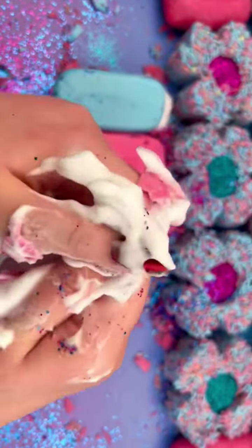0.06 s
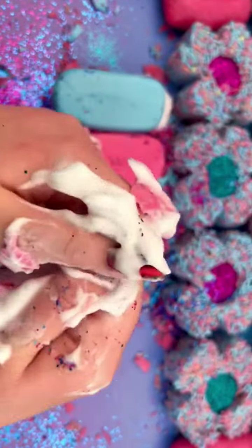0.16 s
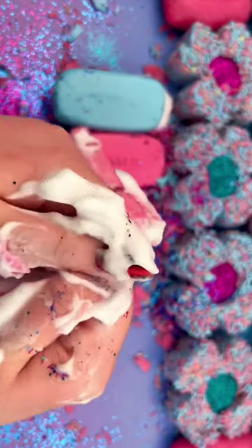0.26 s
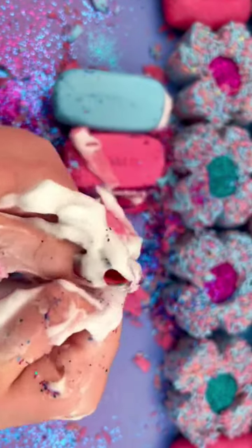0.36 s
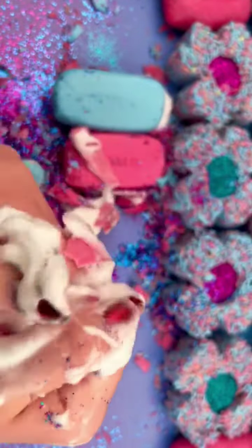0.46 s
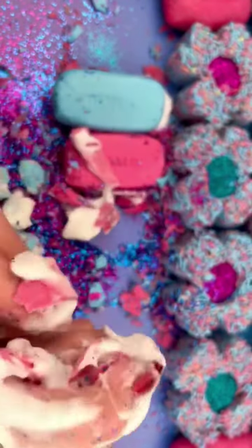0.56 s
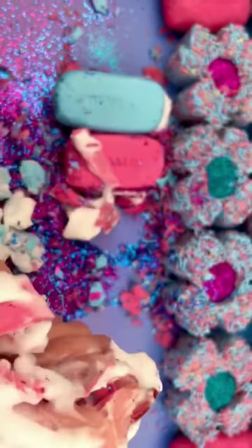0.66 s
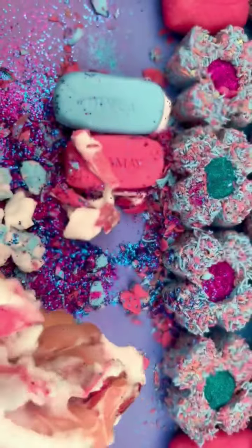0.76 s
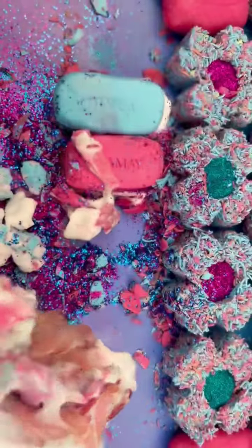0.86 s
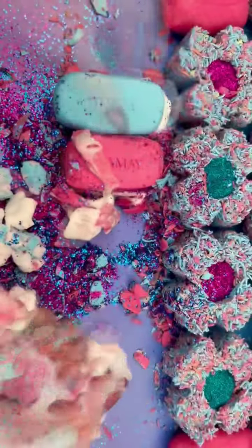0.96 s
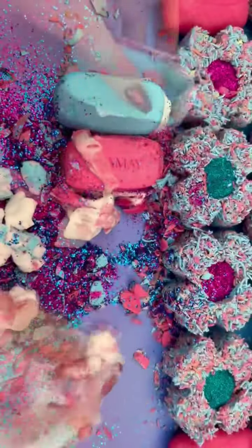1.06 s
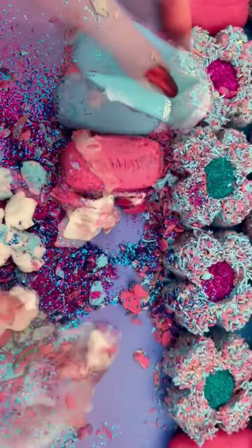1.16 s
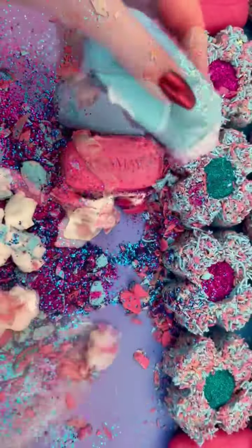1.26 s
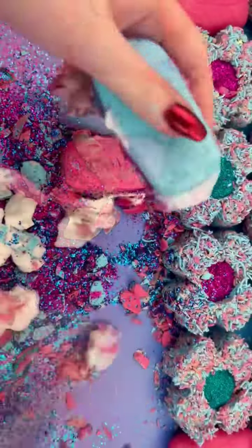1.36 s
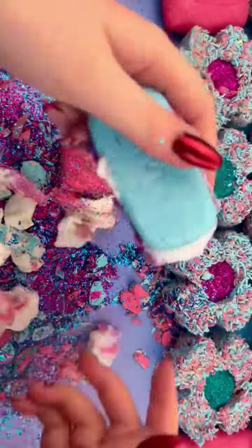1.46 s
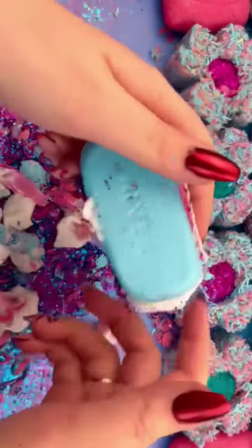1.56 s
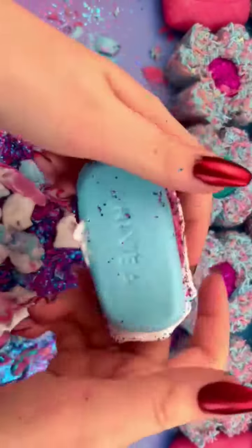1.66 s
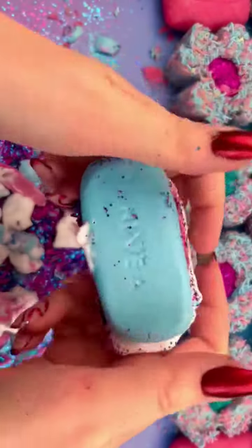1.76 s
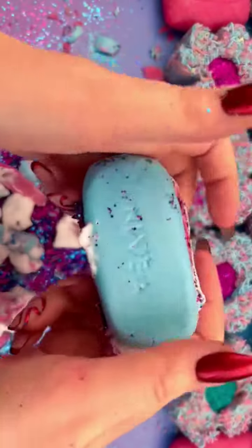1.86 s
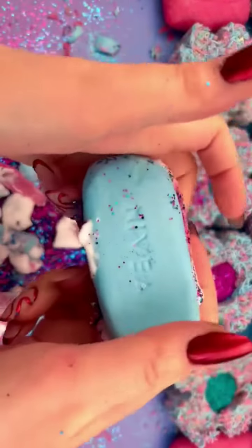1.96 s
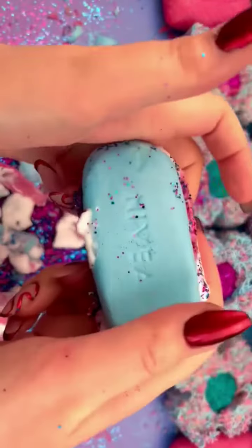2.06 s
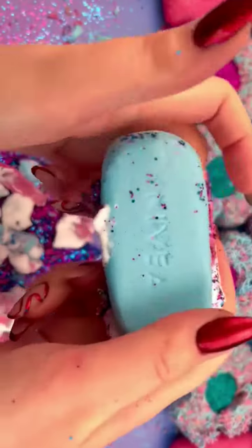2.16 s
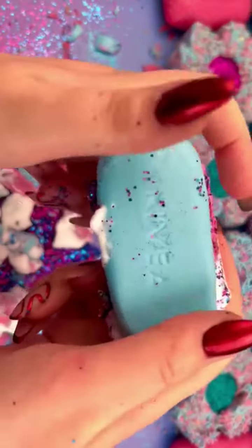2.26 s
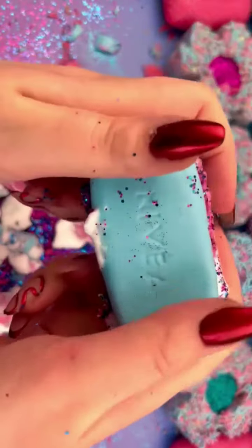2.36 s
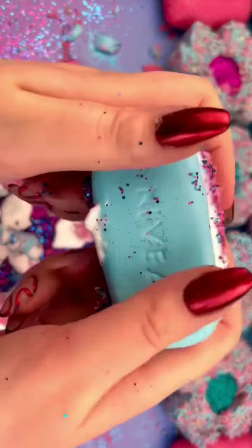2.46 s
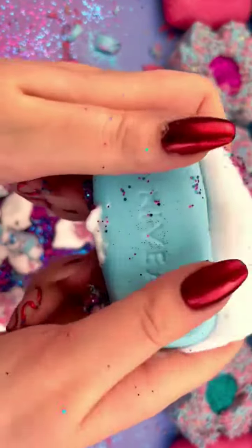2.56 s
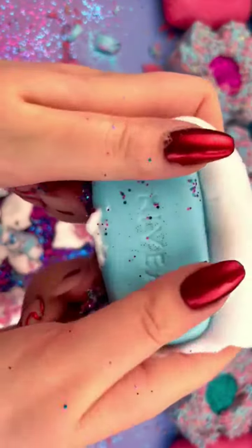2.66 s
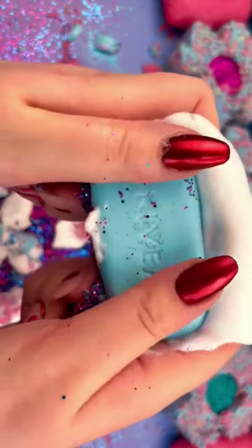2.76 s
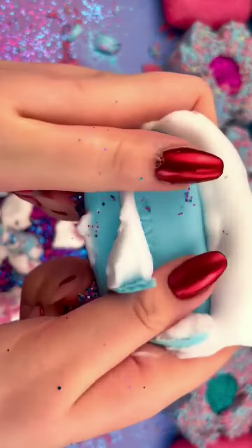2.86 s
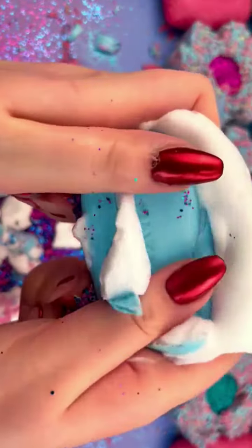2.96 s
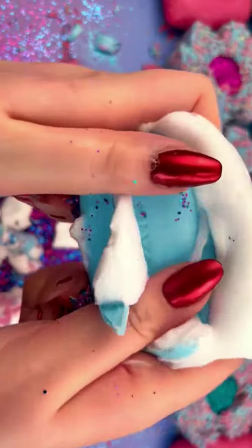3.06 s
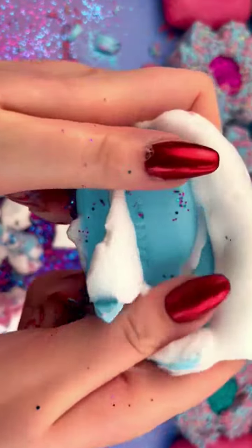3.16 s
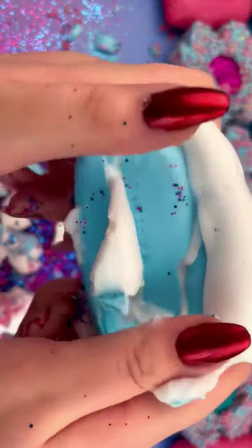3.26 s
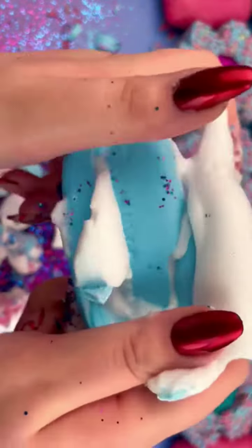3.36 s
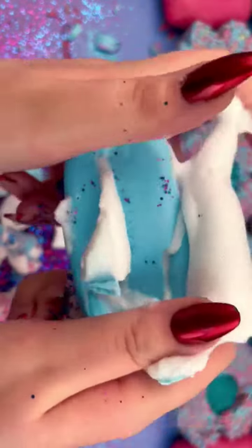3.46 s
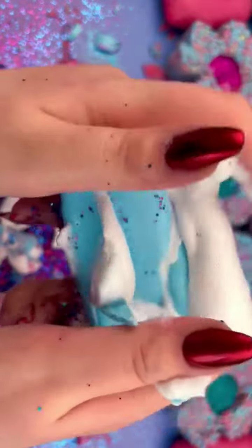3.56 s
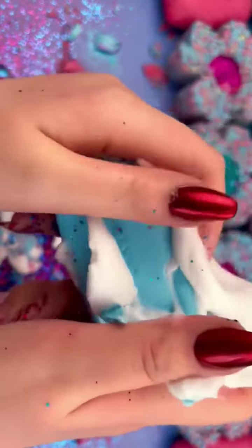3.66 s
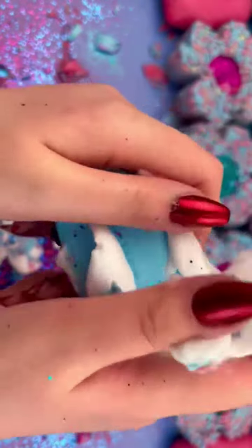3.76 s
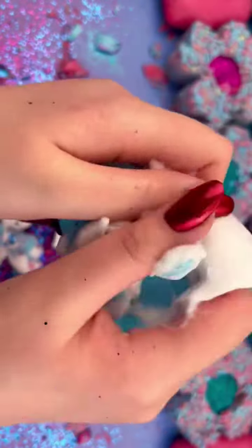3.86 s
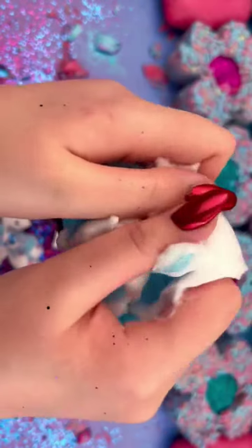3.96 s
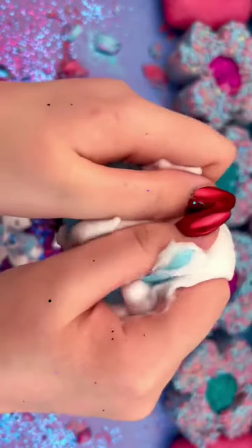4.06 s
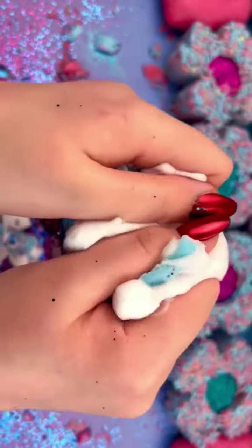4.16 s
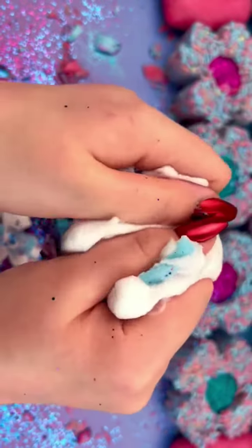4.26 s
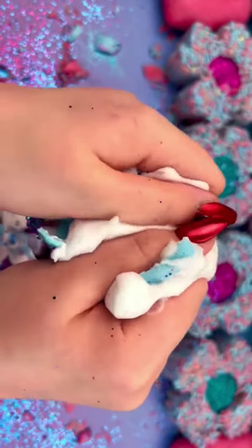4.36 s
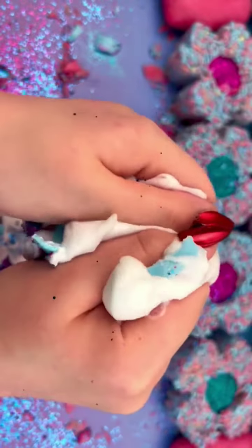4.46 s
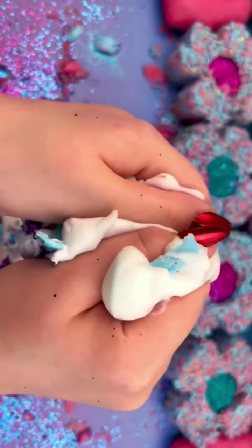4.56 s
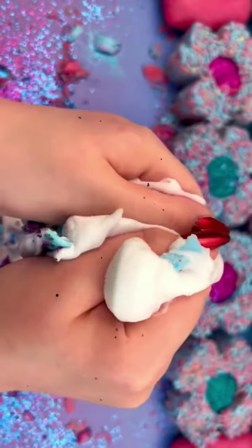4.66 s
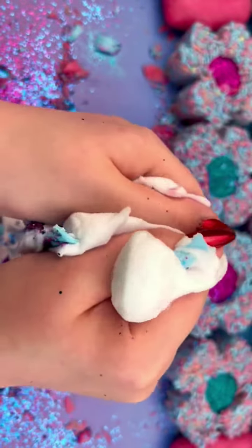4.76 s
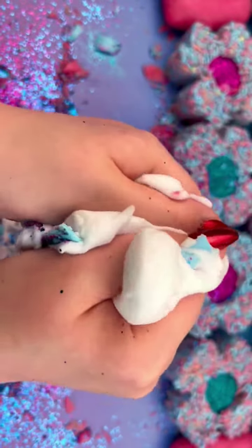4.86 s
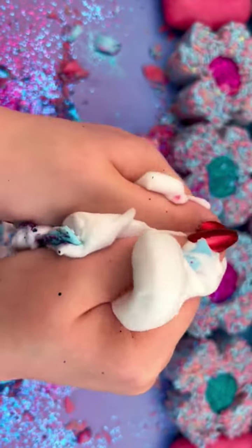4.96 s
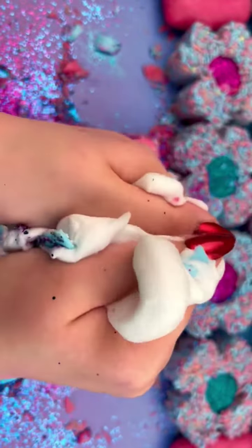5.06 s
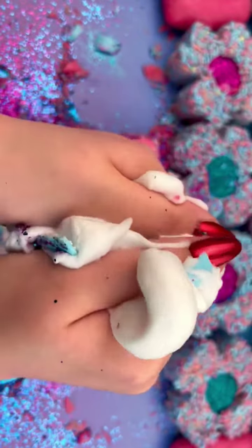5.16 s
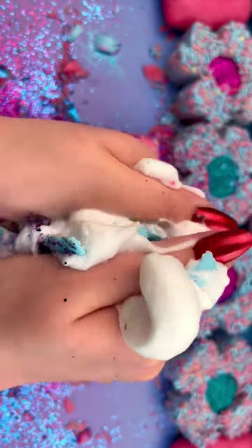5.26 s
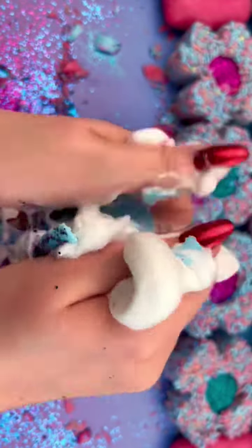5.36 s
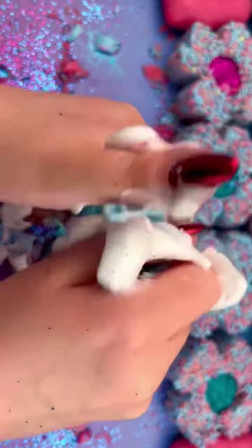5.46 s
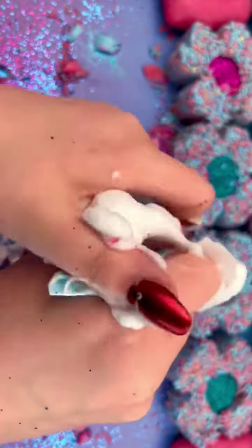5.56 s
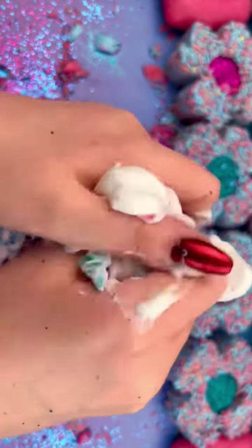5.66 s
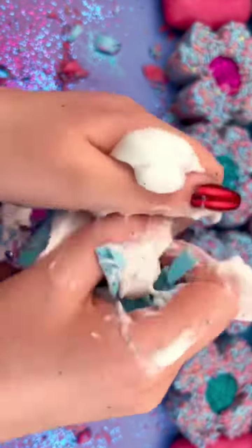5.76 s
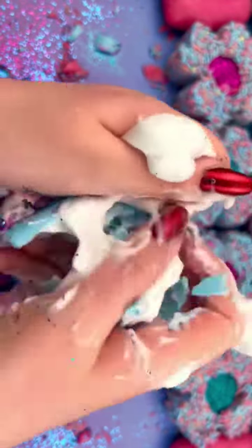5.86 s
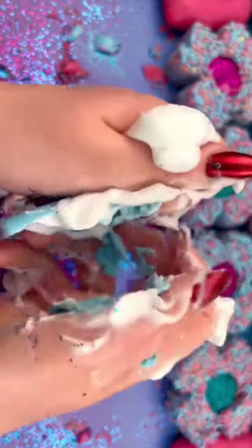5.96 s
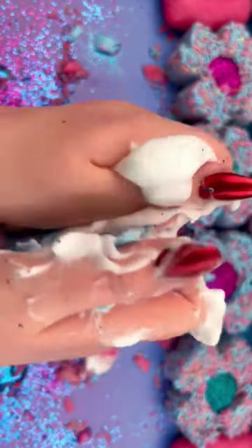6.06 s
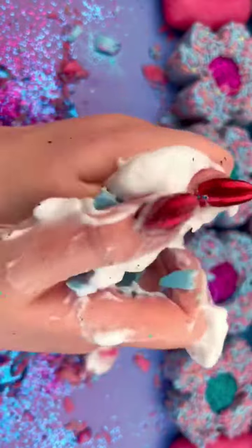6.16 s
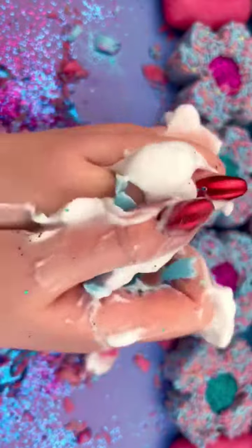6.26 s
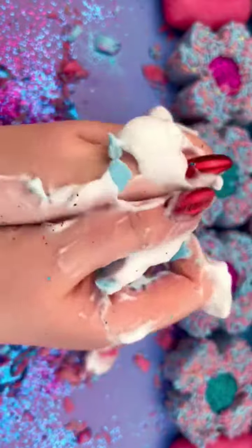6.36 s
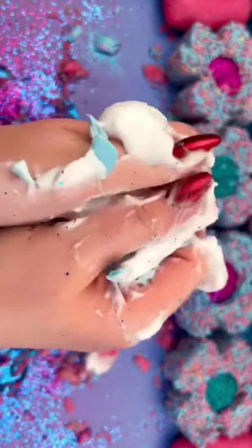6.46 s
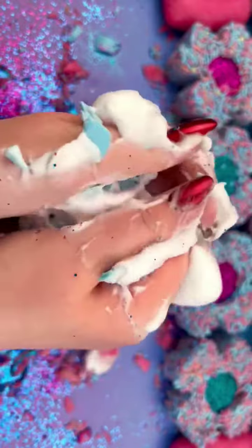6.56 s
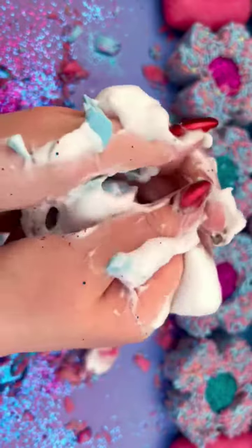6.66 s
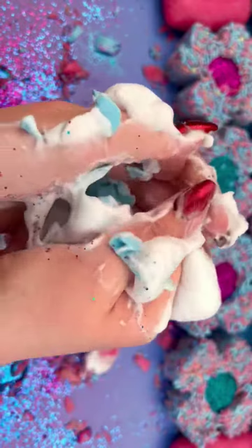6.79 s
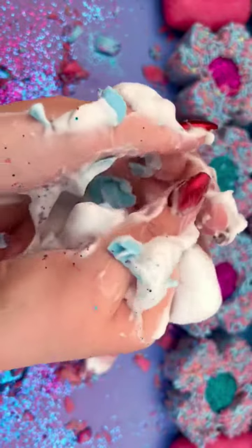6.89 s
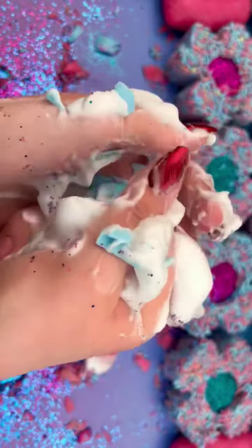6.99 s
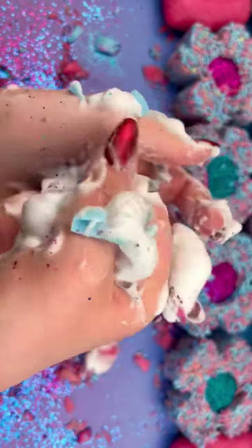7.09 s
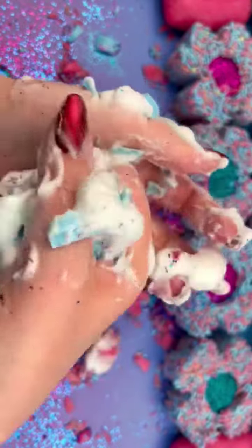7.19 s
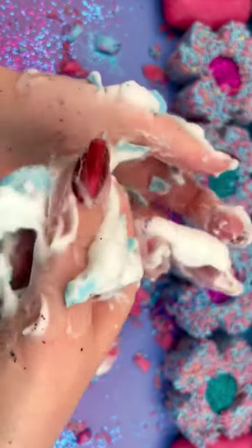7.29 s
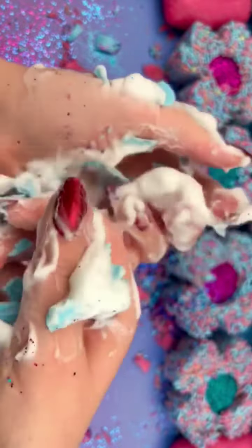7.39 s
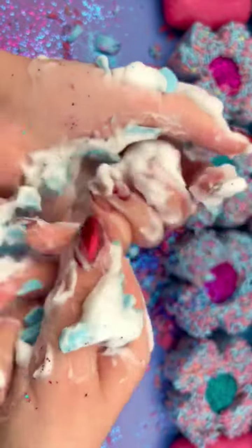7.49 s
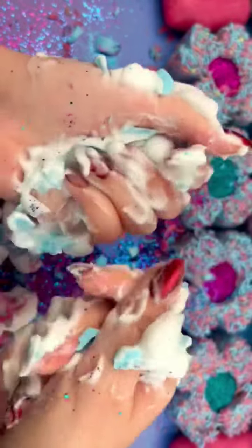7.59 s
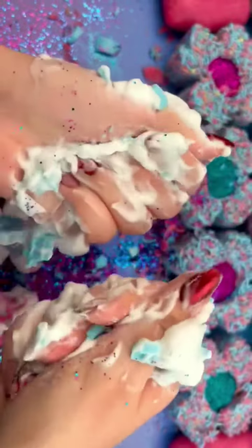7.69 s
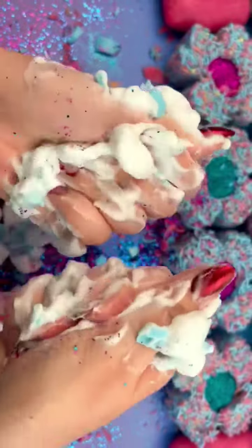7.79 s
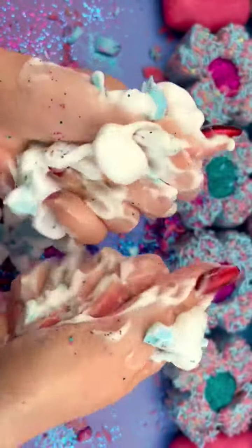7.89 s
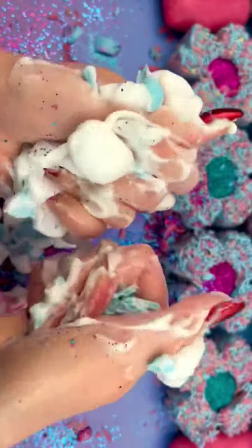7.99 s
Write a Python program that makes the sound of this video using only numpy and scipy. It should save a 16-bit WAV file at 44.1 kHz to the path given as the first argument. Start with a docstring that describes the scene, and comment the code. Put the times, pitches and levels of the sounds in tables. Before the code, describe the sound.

Very close in a quiet small room, hands work foamy lather with soft crackling and small pops, then almost fall silent. A soaked soap bar suddenly cracks in a tight cluster of loud, sharp snaps with dull thuds. After a brief lull a second, wetter run of crunches follows, then continuous squelching, palm gulps and fizzing foam with occasional pops.

```python
"""Wet lather is squeezed, then a soaked bar of soap crushed, in hands close to a microphone in a quiet room.
Crust snaps and trapped air bursts out in short falling chirps, each with a noise spray and a low thud.
Between them streams of tiny chirps make bubble crackle, wet squelch and the gulps of the cupped palms;
flickering noise makes the foam fizz. Finger presses set these levels. Low rumble and room tone lie beneath.
"""
import sys
import numpy as np
from scipy import signal
from scipy.fft import rfft, irfft
from scipy.io import wavfile
from scipy.ndimage import uniform_filter1d

SR = 44100
rng = np.random.default_rng(int(sys.argv[2]) if len(sys.argv) > 2 else 0)


def put_to_file(sound):
    """Save the sound as 16-bit audio at rate SR, in the file named by the first command-line argument."""
    columns = np.atleast_2d(sound).T  # one column per channel
    safe = np.clip(columns, -1, 1)
    whole_steps = np.round(safe * 32767)
    wavfile.write(sys.argv[1], SR, whole_steps.astype(np.int16))


N = 354123
TIME_S = np.arange(N) / SR

# Crust snaps and bursting air pockets. Each row: start in seconds, burst level in dB, pitch in Hz,
# cycles to reach the peak, level in dB of the thud in the palms (both levels before the trims below).
BURSTS = [(0.0156, -20, 1700, 0.94, -49), (0.0461, -29, 1580, .65, -44.5), (0.111, -25, 3160, 1.16, -70),
          (0.212, -28.5, 2840, 0.66, -63), (0.386, -19.5, 3560, 0.6, -54), (0.5704, -22.5, 4400, 1.07, -63),
          (1.0327, -20, 2360, 0.59, -45), (1.1117, -13, 1614, 0.78, -33), (1.3108, -25, 2400, 0.76, -65),
          (1.318, -20.5, 2050, 0.48, -58), (1.3695, -14.5, 1780, 0.65, -51), (1.4247, -26, 1660, .65, -56),
          (1.8466, -41, 6900, 0.41, -86), (2.5992, -19.5, 2020, 0.88, -33), (2.683, -14.5, 2120, 0.62, -33),
          (2.6878, -1, 1750, 0.48, -21), (2.7114, -13.5, 3530, 0.51, -50), (2.7711, -17, 1820, 0.62, -37),
          (2.8226, -7.5, 4500, 1.8, -40), (2.831, 0.5, 3100, 1.1, -47), (2.8345, -1, 1330, 0.78, -19),
          (2.837, -4.5, 2530, 0.89, -27), (2.8404, -9, 1880, 0.72, -11.5), (2.8417, -4, 1370, 0.68, -17.5),
          (2.8828, -18.5, 1700, 1.2, -35), (2.8912, -15, 2200, .5, -48), (2.9093, -11.5, 1400, 0.45, -30),
          (3.037, -17, 1490, 0.55, -55), (3.0733, -20, 1800, 1.46, -44.5), (4.0505, -2, 2160, 0.69, -54),
          (4.0532, -5, 2040, 1.02, -22.5), (4.098, -17.5, 1290, 0.82, -24), (4.124, -14, 1790, 1.5, -33),
          (4.159, -4, 1610, 0.98, -21), (4.1813, -1.5, 3060, 0.8, -12.5), (4.2324, -15, 2370, 0.83, -22),
          (4.2953, -12, 2520, 1.1, -28), (4.3098, -9.5, 1680, 0.88, -29), (4.355, -13, 1900, 0.58, -27),
          (4.3675, -9.5, 1970, 0.44, -28), (4.4604, -5.5, 1860, 0.56, -30), (4.4664, -15.5, 2400, 1.2, -34),
          (4.486, -11.5, 2360, .7, -43), (4.5157, -11.5, 2470, 0.47, -25),
          (4.5714, -14.5, 1710, 0.64, -36.5), (4.5984, -19, 2260, 0.42, -46), (4.649, -21, 1055, 1.16, -36),
          (4.7532, -11.5, 1640, 0.59, -24.5), (4.905, -27, 1780, .75, -24.5), (4.9871, -11, 1570, .75, -35),
          (5.005, -11, 2700, 1.1, -53), (5.0208, -17.5, 1800, 1.07, -43), (5.074, -16, 3650, .55, -41),
          (5.1144, -15, 2330, 0.44, -40), (5.1403, -17, 2170, 0.48, -53.5), (6.101, -8.5, 2220, 1.18, -38),
          (6.536, -17.5, 1660, 0.42, -29.5), (6.5557, -23, 2550, 1.43, -35),
          (6.6664, -20, 2010, 0.64, -57.5), (6.8365, -7.5, 1410, 0.86, -36), (6.8748, -19, 1190, 0.84, -36),
          (6.8845, -15, 1330, 0.96, -37), (6.9444, -23.5, 1720, 1.1, -59), (6.9775, -23.5, 1380, .85, -57),
          (7.8073, -21.5, 2970, 1.1, -40), (7.8155, -18, 2830, 0.43, -41), (7.9694, -19, 2860, 0.96, -46)]
BURST_TRIM_DB, RING_DB, THUD_TRIM_DB = 0.1, -22.5, -1.5  # ring against the burst level
# Spray against the burst level; pockets smaller than the usual one spray more.
SPRAY_DB, SPRAY_DB_PER_OCTAVE, USUAL_POCKET_HZ = -18, 6, 2050
CRUSHED_S, CRUSHED_SPRAY_DB = 4.27, -8.5  # once the crust is broken up and soaked, bursts spray less

# Lone bubbles. Level: peak of the faintest over the crackle, and how much louder one can be.
BLIPS_PER_S, BLIP_LOW_HZ, BLIP_HIGH_HZ, BLIP_CYCLES = 24, 1100, 4200, 1.1
BLIP_DB, BLIP_RANGE_DB = 6, 10

# Presses of the fingers. Each row: start in seconds, seconds until release, force level in dB,
# grip from 0 (loose foam) to 1 (paste shut in the palms), fizz level in dB.
PRESSES = [(0.002, .033, -55, 0.96, -61), (0.284, .06, -52, 0, -53), (0.368, .056, -45.5, 0, -47.5),
           (0.505, 0.13, -58, 0, -58), (0.731, 0.022, -53, .05, -56), (0.909, .028, -52, 0.81, -63),
           (1.014, 0.028, -55, 0.94, -60), (1.098, .05, -59.5, 1, -62.5), (1.406, .017, -55, 0.81, -57),
           (1.71, .035, -66, 0.97, -82), (1.835, .14, -70, 0.0012, -61.5), (2.098, 0.027, -63, 0.76, -58),
           (2.315, .061, -69, 0, -61), (2.534, 0.096, -46, 0.85, -50.5), (2.674, 0.066, -40.5, 0.96, -46),
           (2.813, .01, -31, 0.94, -33), (2.861, .018, -44.5, .99, -50), (2.9, .012, -53, 1, -51),
           (3.006, 0.059, -54, .82, -60), (3.156, .18, -50.5, 0.67, -52.5), (3.5, .031, -50.5, 0.043, -55),
           (3.569, .03, -57, .85, -60), (3.668, .045, -59, 0.76, -55), (4.083, .042, -35.5, .93, -43),
           (4.149, .033, -39, 1, -46), (4.193, 0.046, -48.5, 1, -63), (4.275, 0.017, -36.5, 0.97, -49),
           (4.339, .036, -39.5, 1, -55), (4.434, 0.057, -38.5, 0.99, -57), (4.564, 0.049, -52.5, 1, -74),
           (4.633, 0.079, -45.5, 1, -62), (4.745, .031, -51, 1, -58), (4.833, .15, -42.5, 0.92, -56),
           (5.033, 0.075, -45.5, .86, -54), (5.313, .12, -43, .5, -50.5), (5.56, 0.019, -47.5, 0, -46),
           (5.66, .12, -51.5, 0, -46.5), (5.77, .08, -50.5, 0.99, -56), (6.004, 0.09, -45.5, 0.24, -65),
           (6.088, .057, -51.5, 0.92, -54), (6.169, 0.04, -42, .77, -60), (6.433, 0.12, -48, 0.72, -54),
           (6.523, 0.081, -55, 1, -52), (6.65, .068, -46, 0.89, -54), (6.742, 0.039, -37.5, .79, -45.5),
           (6.834, 0.075, -43.5, .92, -63.5), (6.92, 0.074, -48, 0.59, -66),
           (7.098, 0.041, -44.5, .16, -44), (7.212, 0.046, -43, 0.51, -50),
           (7.383, 0.19, -48.5, 0.16, -54.5), (7.608, .053, -45.5, 0.64, -49), (7.75, .11, -49.5, 0.9, -51),
           (7.882, 0.17, -51, 0.65, -56)]
ATTACK_S, RELEASE_S = 0.013, 0.031
# Lather that keeps sounding on the moving hands. Each row: time in seconds, crackle level in dB, fizz level in dB.
HANDLING = [(0.0, -59.5, -60), (0.89, -58.5, -56), (1.0, -75, -71), (1.25, -70.5, -76), (1.41, -64.5, -74),
            (1.69, -69, -67), (2.03, -97, -94), (2.43, -83, -69), (2.53, -49.5, -50.5),
            (3.45, -76.5, -71.5), (3.5, -60, -59.5), (4.02, -54.5, -53), (4.74, -56.5, -63.5),
            (5.32, -48.5, -53.5), (5.53, -60.5, -59.5), (6.26, -50, -51), (7.04, -53, -59),
            (8.03, -49, -48.5)]
HANDLING_GRIP = 0.27
# Level against the force in loose foam, and what a full grip adds.
LOOSE_SQUELCH_DB, GRIP_SQUELCH_DB = -18.8, 19
LOOSE_GULP_DB, GRIP_GULP_DB = -27, 25.5

# Rumbles as the arms shift. Each row: middle in seconds, time from the middle to -17 dB in seconds, level in dB.
SHOVES = [(0.243, 0.13, -64.5), (0.626, 0.076, -53.5), (0.703, 0.13, -58), (1.02, 0.33, -64),
          (2.9, 0.11, -58), (3.497, 0.15, -53.5), (4.283, 0.55, -59), (5.124, 0.12, -59),
          (5.695, .1, -69.5)]
ROOM_TONE_DB = -68.5

# Spectra. Each row: frequency in Hz, relative level in dB.
SPRAY_CURVE = [(1500, -10.5), (4000, 12.5), (6000, 4), (7500, -1), (11500, 0), (15500, -5)]
# Small bubbles.
CRACKLE_CURVE = [(600, -13), (1000, -11.5), (1400, -6), (2400, -2), (3600, 2), (4600, -2), (6000, -0.5),
                 (7200, -11.5), (15000, -23)]
# Tearing wet paste.
SQUELCH_CURVE = [(200, -19.5), (420, -5.5), (650, -2), (900, 5), (1400, 6), (2800, -8.5)]
# Finest foam.
FIZZ_CURVE = [(2500, -14.5), (5000, 1), (7000, -3.5), (9000, -1.5), (12000, -1), (15500, -5)]
# The hollow between the palms.
HOLLOW_CURVE = [(80, -7), (125, -7), (160, -1.5), (205, -6.5), (260, 1.5), (340, 3), (440, 0), (550, -2.5),
                (900, -16.5)]
# Arm rumble.
RUMBLE_CURVE = [(25, -27.5), (45, -18.5), (80, 5), (120, -2.5), (180, -7.5), (280, -16), (900, -41)]
NEAR_ECHO_CURVE = [(200, 1.5), (900, -2), (3000, 5.5), (6000, -9.0), (15000, -42)]
FAR_ECHO_CURVE = [(100, 7), (350, -2.5), (1400, -10), (4000, -10.5), (15000, -19.5)]
# Background of the quiet room.
ROOM_TONE_CURVE = [(25, -19.5), (70, 6), (130, -1.5), (1000, -12), (2000, -17.5), (7000, -22.5),
                   (15000, -18.5)]


def undb(db):
    """Decibels to amplitude gain."""
    return 10 ** (np.asarray(db) / 20)


def unit(x):
    """Scale to rms 1."""
    return x / np.sqrt(np.mean(x ** 2))


def add(out, start_s, sound):
    """Mix a short sound into out, in place."""
    i = max(int(start_s * SR), 0)
    out[i:i + len(sound)] += sound[:max(len(out) - i, 0)]


def colour(x, curve):
    """Minimum-phase filter with the given spectrum, built by folding the cepstrum; the result has rms 1."""
    hz, db = np.transpose(curve)
    grid_hz = np.maximum(np.fft.rfftfreq(4096, 1 / SR), 1)
    gain = undb(np.interp(np.log(grid_hz), np.log(hz), db))
    cepstrum = irfft(np.log(gain))
    half = len(cepstrum) // 2
    cepstrum[1:half] *= 2
    cepstrum[half + 1:] = 0
    impulse = irfft(np.exp(rfft(cepstrum)))
    return unit(signal.fftconvolve(x, impulse)[:len(x)])


def walk(rate_hz):
    """Smooth random wander, rms 1: random steps under a moving average."""
    step = max(int(SR / rate_hz), 1)
    steps = np.repeat(rng.standard_normal(N // step + 1), step)[:N]
    return unit(uniform_filter1d(steps, step))


def chirp(hz, cycles, fall):
    """A film gives way: a few cycles swell and die while the opening pocket keeps dropping in pitch."""
    rise_s = max(cycles, 0.3) / hz
    age = np.arange(int(6 * rise_s * SR) + 2) / (rise_s * SR)  # in rise times
    pitch_hz = hz * np.exp(-fall * (age - 1.2))
    swell = (age * np.exp(1 - age)) ** 2
    wave = swell * np.sin(2 * np.pi * np.cumsum(pitch_hz) / SR)
    # so small a source moves no net air
    return wave - swell * wave.sum() / swell.sum()


def pops():
    """Each burst is a chirp, a brief spray of droplets and crumbs, and a thud sliding down into the palms."""
    out = np.zeros(N)
    t_s = np.arange(SR // 25) / SR
    spray = colour(rng.standard_normal(N), SPRAY_CURVE)
    spray_shape = np.exp(-t_s / 0.0016) + 0.22 * np.exp(-t_s / 0.0089)
    for start_s, burst_db, hz, cycles, thud_db in BURSTS:
        pocket, place = rng.random(2)
        add(out, start_s, undb(burst_db + BURST_TRIM_DB) * chirp(hz, cycles, fall=0.34))

        # the opened pocket rings on, lower and longer
        add(out, start_s, undb(burst_db + RING_DB) * chirp(0.5956 * hz, 3.06 * cycles, fall=0.32))

        spray_db = burst_db + SPRAY_DB + SPRAY_DB_PER_OCTAVE * np.log2(hz / USUAL_POCKET_HZ)
        if start_s > CRUSHED_S:
            spray_db += CRUSHED_SPRAY_DB
        i = int(place * (N - len(t_s)))
        add(out, start_s, undb(spray_db) * spray_shape * spray[i:i + len(t_s)])

        thud = chirp(340 + 150 * pocket, cycles=0.83, fall=0.38)
        add(out, start_s, undb(thud_db + THUD_TRIM_DB) * thud)
    return out


def blips(crackle_db):
    """Now and then a middling bubble bursts alone and stands out of the crackle with a short wet ring."""
    out = np.zeros(N)
    for when, size, pitch, ring in rng.random((int(BLIPS_PER_S * N / SR), 4)):
        db = crackle_db[int(when * N)] + BLIP_DB + BLIP_RANGE_DB * size
        hz = BLIP_LOW_HZ * (BLIP_HIGH_HZ / BLIP_LOW_HZ) ** pitch
        add(out, when * N / SR, undb(db) * chirp(hz, BLIP_CYCLES * (0.5 + ring), fall=0.2))
    return out


def bubbles(rate_hz, low_hz, high_hz, cycles, spread_db, count=96):
    """Stream of tiny bursts, mostly faint; pitch wanders as the gaps between the fingers change."""
    pitches_hz = np.geomspace(low_hz, high_hz, count)
    rings = rng.random(count)
    signs = rng.choice([-1, 1], count)
    voices = [sign * chirp(hz, cycles * (0.5 + ring), fall=0.27)
              for hz, ring, sign in zip(pitches_hz, rings, signs)]
    gap = np.tanh(walk(30))
    when, force, pitch = rng.random((int(rate_hz * N / SR), 3)).T
    gains = undb(-spread_db * np.log(np.maximum(force, 0.01)))
    pitch = np.clip(pitch + 0.14 * gap[(when * N).astype(int)], 0, 1)
    picks = (pitch * (count - 1)).astype(int)
    out = np.zeros(N)
    for start_s, gain, pick in zip(when * N / SR, gains, picks):
        add(out, start_s, gain * voices[pick])
    # the hands drive the air out at an even pace, however it is split into bubbles
    return out / np.sqrt(uniform_filter1d(out ** 2, size=5000) + 1e-9)


def lather(crackle_db, squelch_db, fizz_db):
    """Small bubbles crackle, wet paste tears with dry smacks, the finest foam fizzes."""
    crackle = bubbles(rate_hz=2200, low_hz=1288, high_hz=5960, cycles=0.73, spread_db=4.0)
    squelch = bubbles(rate_hz=900, low_hz=516, high_hz=1600, cycles=0.38, spread_db=5.0)
    flicker_db = 3.3 * rng.standard_normal(N) + 2 * walk(400)
    films = rng.standard_normal(N) * undb(flicker_db)
    # each bursting bubble tears the fine foam around it
    films = films * np.sqrt(1 + 0.27 * uniform_filter1d(crackle ** 2, size=40))
    # the paste sticks and slips, so the sound comes in small surges
    surge = unit(undb(2.4 * walk(45)))
    return surge * (colour(crackle, CRACKLE_CURVE) * undb(crackle_db)
                    + colour(squelch, SQUELCH_CURVE) * undb(squelch_db)
                    + colour(films, FIZZ_CURVE) * undb(fizz_db))


def palms(gulp_db):
    """Large pockets of air shift with soft gulps in the hollow of the hands."""
    gulps = bubbles(rate_hz=450, low_hz=141.0, high_hz=560, cycles=0.48, spread_db=4.0)
    return undb(gulp_db) * colour(gulps, HOLLOW_CURVE)


def hold_powers(force_db, grip, fizz_db):
    """Powers of crackle, squelch, fizz and gulps; gulps need the palms nearly shut, hence grip squared."""
    squelch_db = force_db + LOOSE_SQUELCH_DB + GRIP_SQUELCH_DB * grip
    gulp_db = force_db + LOOSE_GULP_DB + GRIP_GULP_DB * grip ** 2
    return undb([force_db, squelch_db, fizz_db, gulp_db]) ** 2


def kneading():
    """Levels in dB of crackle, squelch, fizz and gulps: powers of the handling and all presses add up."""
    times_s, crackle_db, fizz_db = np.transpose(HANDLING)
    total = hold_powers(np.interp(TIME_S, times_s, crackle_db), HANDLING_GRIP,
                        np.interp(TIME_S, times_s, fizz_db))
    age_s = TIME_S[:SR // 2]
    for start_s, length_s, force_db, grip, press_fizz_db in PRESSES:
        build = np.minimum(age_s / ATTACK_S, 1)
        release = np.exp(-np.maximum(age_s - length_s, 0) / RELEASE_S)
        powers = hold_powers(force_db, np.clip(grip, 0, 1), press_fizz_db)
        for layer, power in zip(total, powers):
            add(layer, start_s, power * (build * release) ** 2)
    return 10 * np.log10(total)


def arms():
    """Shifting arms: low noise under soft bell-shaped swells."""
    swell = np.zeros(N)
    for middle_s, reach_s, db in SHOVES:
        swell += undb(db) * np.exp(-2 * ((TIME_S - middle_s) / reach_s) ** 2)
    return swell * colour(rng.standard_normal(N), RUMBLE_CURVE)


def room(x):
    """Quick echoes from the hands and table top, then the faint tail of a small room, as decaying noise."""
    t_s = np.arange(SR // 2) / SR
    near = colour(rng.standard_normal(len(t_s)), NEAR_ECHO_CURVE)
    far = colour(rng.standard_normal(len(t_s)), FAR_ECHO_CURVE)
    near = near * (t_s > 0.0018) * np.exp(-t_s / 0.0018)
    far = far * (t_s > 0.008) * np.exp(-np.log(1000) * t_s / 0.36)  # 60 dB down in 0.36 s
    echoes = undb(-18.5) * near / np.linalg.norm(near) + undb(-21.5) * far / np.linalg.norm(far)
    return x + signal.fftconvolve(x, echoes)[:N]


def room_tone():
    """Steady coloured noise of a very quiet room."""
    return undb(ROOM_TONE_DB) * colour(rng.standard_normal(N), ROOM_TONE_CURVE)


def scene():
    """Kneading and its bursts, with echoes, over arm rumble and room tone."""
    crackle_db, squelch_db, fizz_db, gulp_db = kneading()
    hands = pops() + blips(crackle_db) + lather(crackle_db, squelch_db, fizz_db) + palms(gulp_db)
    return (room(hands) + arms() + room_tone())[None]


def record(dry):
    """The microphone flattens the very loudest peaks, thins the deepest bass and cuts the top."""
    bass_cut = signal.butter(2, 42, "high", fs=SR, output="sos")
    top_cut = signal.ellip(10, 0.2, 80, 15600, fs=SR, output="sos")  # ripple dB, stopband dB, edge Hz
    return signal.sosfilt(np.vstack([bass_cut, top_cut]), np.clip(dry, -0.88, 0.88))


dry = scene()
out = record(dry)
put_to_file(out)
```